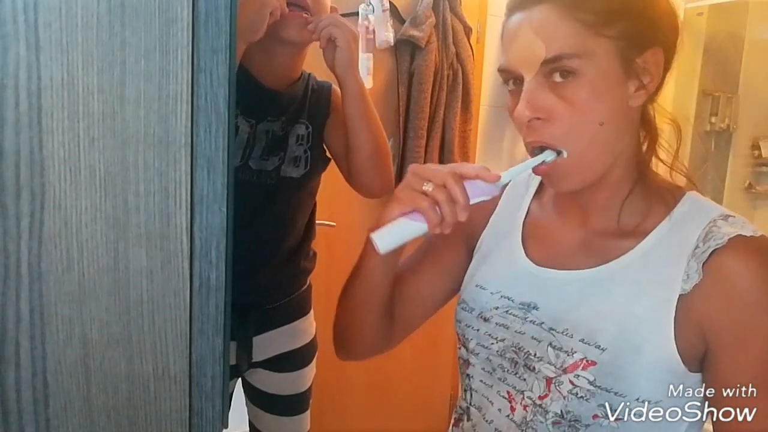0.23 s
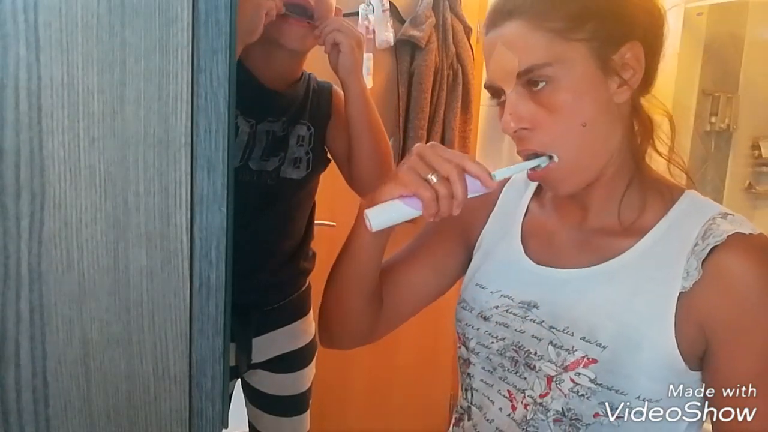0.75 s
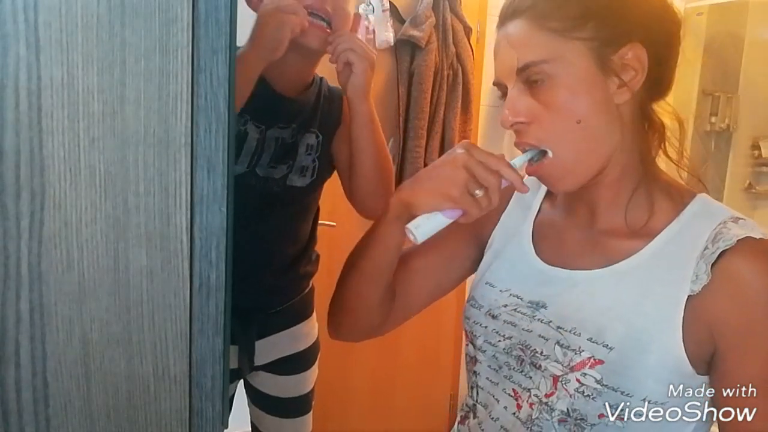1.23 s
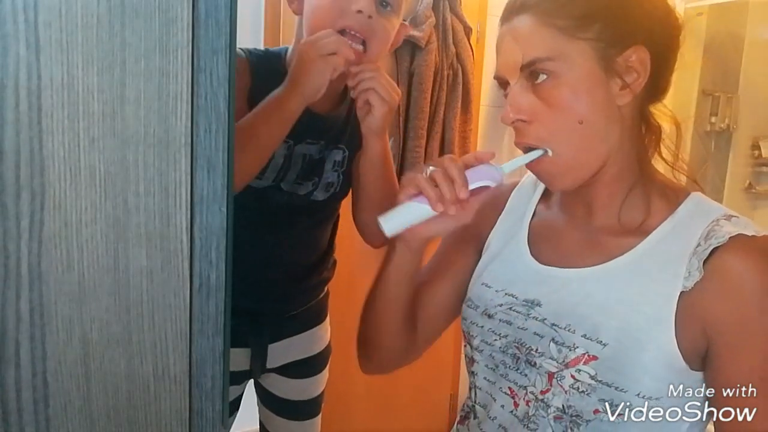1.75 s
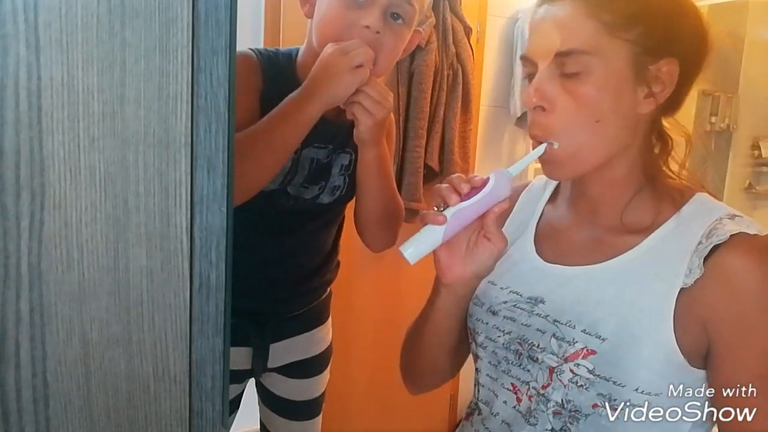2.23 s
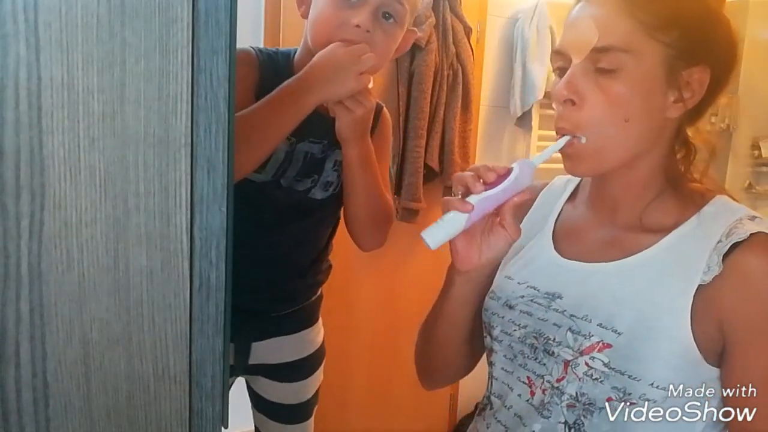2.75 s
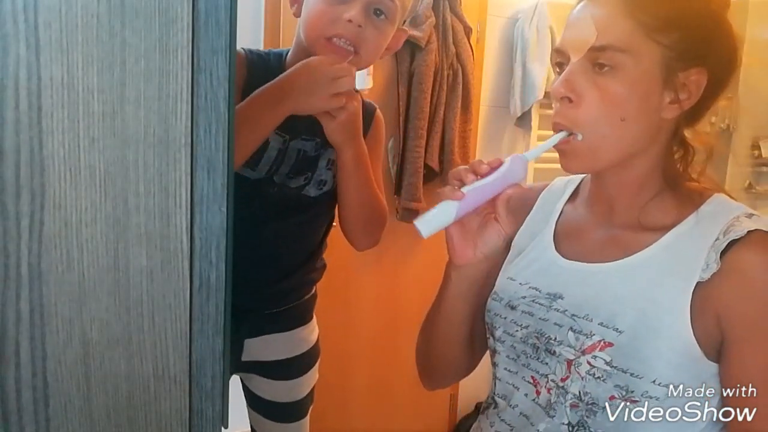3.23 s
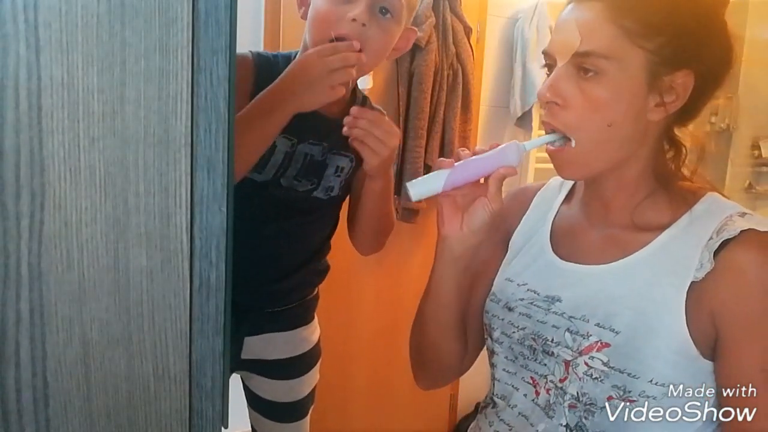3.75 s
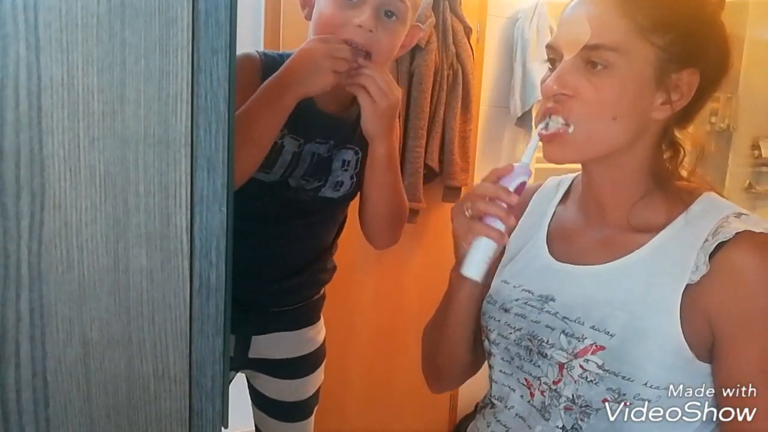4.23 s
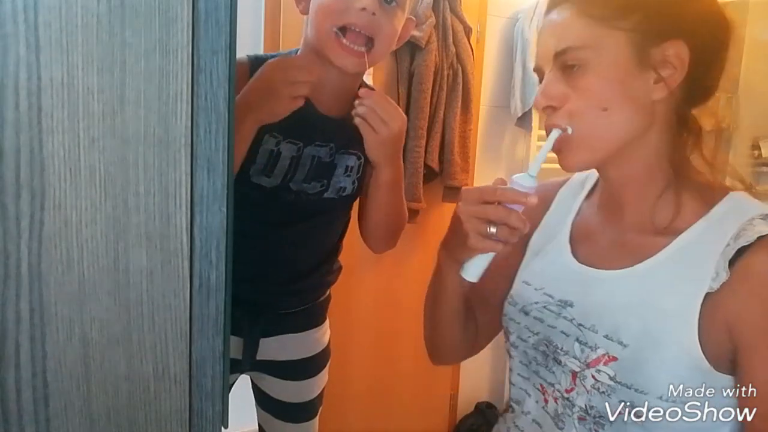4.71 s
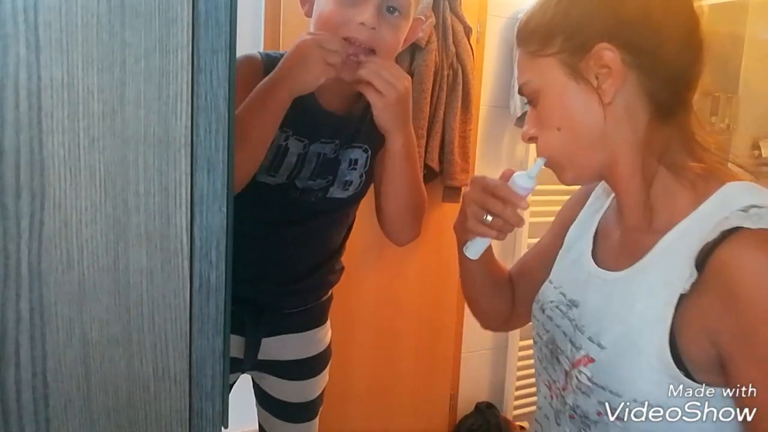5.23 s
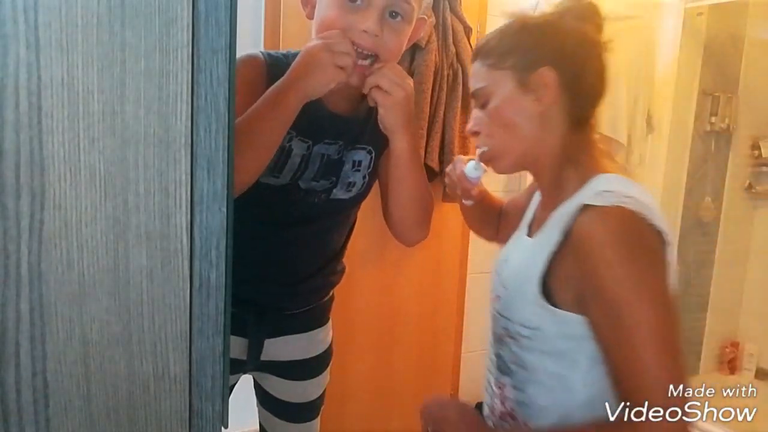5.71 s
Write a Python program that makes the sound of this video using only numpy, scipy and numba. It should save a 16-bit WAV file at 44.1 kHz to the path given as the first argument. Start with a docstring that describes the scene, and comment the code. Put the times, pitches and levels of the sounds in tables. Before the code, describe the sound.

For about six seconds an electric toothbrush buzzes continuously, already running at the start and still running at the end. It is a fast, grainy rattle, roughly sixty swings a second with a clack at each reversal, mixed with whirr, crisp bristle hiss and a weak, flickering motor hum near 480 Hz. The speed wavers a little as the brush is pressed, dipping around 1.2 s. The mouth colours it: a hollow, nasal swell around 1 to 1.4 s, others near 2.1, 3.4 and 3.8 to 4.2 s, then a thinner, drier buzz from about 4.5 s. A faint high ringing shows near 0.4 to 0.7 s, and a thin clean gear whine around 1.7 kHz from 2 to 3.3 s. Soft dull low bumps are sparse early, frequent after 3.2 s and nearly continuous from 5.3 s. Close stereo pickup, slightly uneven between sides, with short bright tiled reverberation and softened extreme treble.

```python
"""A fast, rattling buzz with a scrubbing hiss: an electric toothbrush works along the teeth in a small tiled
bathroom, close to a pair of microphone ports, over short dull patches of low noise.
The head swings to and fro about 62 times a second; noise bursts at each reversal make its clack over gear whirr.
Filters and moving resonances shape these blows into handle, bristles and mouth; two tones make the gears,
resonant noise the motor hum, delayed copies and noise tails the room, and narrow noise the dull patches."""
import sys
import numpy as np
from scipy import signal
from scipy.fft import rfft, irfft, next_fast_len
from scipy.io import wavfile
from scipy.ndimage import uniform_filter1d, map_coordinates
from numba import njit

SR = 44100
rng = np.random.default_rng(int(sys.argv[2]) if len(sys.argv) > 2 else 0)


def field_ratio(decibels):
    """Amplitude ratio for a level in dB (20 dB per decade); scalars and array-likes work."""
    return 10 ** (np.asarray(decibels, dtype=float) / 20)


def master_out(mix):
    """Clip the mix to full scale and print it as 16-bit PCM to the path in sys.argv[1]."""
    frames = np.transpose(np.atleast_2d(mix))
    ceiling = np.clip(frames, -1, 1)
    pcm = np.round(ceiling * 32767).astype(np.int16)
    wavfile.write(sys.argv[1], SR, pcm)


N = 263277


def unit(x):
    """x at rms 1."""
    return x / np.sqrt(np.mean(x ** 2) + 1e-20)


def along(points, hz):
    """Reads (frequency, value) points on a log frequency axis."""
    f, v = np.transpose(points)
    return np.interp(np.log(hz + 1), np.log(f + 1), v)


def curves(rows):
    """One value per sample for each column after the time."""
    s, *cols = np.transpose(rows)
    return [np.interp(np.arange(N) / SR, s, c) for c in cols]


def wobble(rate):
    """A smooth random curve, rate knots a second."""
    return map_coordinates(rng.standard_normal(int(N * rate / SR) + 4), [np.arange(N) * rate / SR])


def filtered(x, response):
    """x through a complex response of frequency."""
    m = next_fast_len(N + 8192)
    return irfft(rfft(x, m) * response(np.fft.rfftfreq(m, 1 / SR)), m)[..., :N]


@njit
def two_pole(x, pull, keep):
    """A resonator whose tuning changes sample by sample."""
    y = np.zeros(len(x))
    for n in range(2, len(x)):
        y[n] = x[n] - x[n - 2] + pull[n] * y[n - 1] - keep * y[n - 2]
    return y


def ring(x, hz, width_hz):
    """x through a moving resonance, at rms 1; a narrower resonance rings longer."""
    r = np.exp(-np.pi * width_hz / SR)
    return unit(two_pole(x, 2 * r * np.cos(2 * np.pi * hz / SR), r * r))


def clacks(rate, lean_db):
    """Envelope of the drive: a steady whirr with a short decaying burst at each reversal of the head."""
    clack_db, scatter_db = 12.5, 1.4  # clack over whirr, and its spread from blow to blow
    decay_s, late_s = 0.0017, .00017
    first_swing = .33  # part of a swing already done at the start
    half_swings = 2 * (first_swing + np.cumsum(rate) / SR)
    k = np.floor(half_swings).astype(int)
    luck = rng.standard_normal((k[-1] + 1, 2))
    # play in the gears delays each blow a little
    since = (half_swings - k) / (2 * rate) - late_s * np.abs(luck[k, 1])
    size = field_ratio(clack_db + scatter_db * luck[k, 0] + lean_db * (.5 - k % 2))
    return 1 + size * (since > 0) * np.exp(-np.abs(since) / decay_s)


def handle_body(drive, knock, level_db):
    """The blows shake the whole handle, whose body gives them a fixed spectrum."""
    # spectrum of the handle's body: (frequency [Hz], relative level [dB])
    body_shape = [(330, -38.5), (560, -12.5), (700, -10.5), (850, -7.5), (930, 1.5), (1100, -5.5),
                  (1550, -1.5), (1680, -2.5), (2300, -4.5), (2620, 0.5), (2800, -6), (2960, 1.5),
                  (3450, 0.5), (4200, -3), (5400, -6), (7500, -9), (12000, -27)]
    body = unit(filtered(drive(0.6) + 0.26 * knock, lambda hz: field_ratio(along(body_shape, hz))))
    return field_ratio(level_db + 3.0 + 1.6 * wobble(7.3)) * body


def handle_rings(drive, knock, rate, bare_db):
    """Two handle resonances: the low one rises with the swing rate, the high one moves with the grip."""
    # high handle ring: (time [s], level before trim [dB], pitch [Hz])
    shell_moves = [(0.0, -33, 6500), (0.01, -43.5, 6730), (0.66, -47.5, 6230), (0.78, -48.5, 6340),
                   (0.88, -56, 6550), (0.95, -42.5, 6300), (1.11, -47, 6370), (1.56, -44.5, 6700),
                   (1.93, -45.5, 6360), (2.13, -53.5, 6940), (2.31, -43, 6770), (2.96, -54, 6830),
                   (3.19, -44, 6850), (3.52, -47, 6970), (3.69, -49, 6250), (3.91, -45, 6070),
                   (4.11, -48, 6760), (4.42, -41.5, 6240), (4.51, -50.5, 6320), (5.12, -46, 6930),
                   (5.17, -45.5, 6400), (5.97, -55.5, 6580)]
    shell_db, shell_hz = curves(shell_moves)
    grip_db = 1.2  # shifting fingers damp each ring unevenly
    whine_hz = 4950 + 14 * (rate - 62)  # 14 Hz up per extra swing a second
    whine = ring(drive(1.0) + 0.27 * knock, whine_hz, 350)
    whine = field_ratio(bare_db - 4.5 + grip_db * wobble(10)) * whine
    shell = ring(drive(1.87) + knock, shell_hz, 940)
    shell = field_ratio(shell_db - 2 + grip_db * wobble(7.1)) * shell
    return whine + shell


def bristles(drive):
    """Scrub on the teeth is treble noise: one fizz from the brush and a spray separate at each port."""
    # bristles on the teeth: (time [s], level before trims [dB])
    scrub_moves = [(0.0, -43.5), (0.03, -49.5), (0.08, -49.5), (0.66, -52), (0.8, -50), (0.86, -51.5),
                   (1.96, -53), (2.01, -51), (2.04, -48.5), (2.28, -53), (3.62, -51), (3.82, -53.5),
                   (3.99, -50), (4.12, -52.5), (4.16, -50), (4.65, -52), (4.89, -47.5), (4.92, -53.5),
                   (5.02, -52.5), (5.92, -52.5), (5.95, -69), (5.97, -54)]
    # spectrum of the bristles: (frequency [Hz], relative level [dB])
    fizz_shape = [(3000, -29), (5500, 0), (7200, -5), (7700, -4.5), (8300, 1), (10000, -1.5), (12000, -3.5),
                  (13700, -12), (14400, -10.5), (15500, -31)]
    scrub_db, = curves(scrub_moves)
    response = lambda hz: field_ratio(along(fizz_shape, hz))
    fizz = field_ratio(scrub_db + 4 + 0.69 * wobble(13)) * unit(filtered(drive(1.13), response))
    both_ports = np.array([drive(0.8), drive(0.88)])
    spray = field_ratio(scrub_db - 1.5) * unit(filtered(both_ports, response))
    return fizz, spray


def mouth(drive, knock):
    """The blows excite two moving resonances of the mouth, and the lips flutter round the brush."""
    # shape of the mouth: (time [s], low resonance [Hz], level before trim [dB], high resonance over low [dB])
    mouth_shape = [(0, 1380, -48, 12), (.2, 1300, -53, 3), (.45, 1370, -52, 9), (.65, 1380, -51, 4),
                   (.85, 1470, -51, 3.5), (.98, 1410, -44.5, 0), (1.08, 1280, -40.5, 3),
                   (1.22, 1250, -43.5, 0), (1.38, 1230, -43, -3), (1.6, 1310, -50.5, 2),
                   (1.9, 1304, -54, 9), (2.1, 1530, -46, -9), (2.5, 1430, -55, 1), (2.95, 1480, -59, 6.5),
                   (3.35, 1370, -45, -3), (3.5, 1350, -48, -3), (3.66, 1390, -50, -10),
                   (3.76, 1390, -44, -12), (3.9, 1540, -49, -29), (4.17, 1410, -44, 1),
                   (4.34, 945, -51.5, -22), (4.55, 1530, -70, 1), (4.78, 1460, -63, 20),
                   (4.9, 1300, -75, 16), (5.05, 1480, -76, -13), (5.3, 1440, -55, 13),
                   (5.5, 1480, -57, -21), (5.97, 1380, -90, -14)]
    # high resonance of the mouth: (time [s], pitch [Hz])
    upper_pitch = [(0.0, 1820), (0.83, 1830), (1.01, 2000), (2.11, 1800), (2.24, 1880), (2.56, 1720),
                   (2.71, 1980), (3.04, 1900), (3.08, 2080), (3.81, 1900), (3.91, 1820), (4.17, 1820),
                   (4.21, 1950), (4.7, 1730), (4.82, 2020), (5.4, 1870), (5.75, 1900), (5.97, 1840)]
    low_hz, low_db, tilt_db = curves(mouth_shape)
    high_hz, = curves(upper_pitch)
    lips_db, lips_hz = 1.4, 35  # scale of the flutter in level and pitch
    low = ring(drive(1.44) + knock, low_hz + lips_hz * wobble(12), 220)
    low = field_ratio(lips_db * wobble(10)) * low
    high = ring(drive(1.1) + knock, high_hz, 380)
    high = field_ratio(tilt_db + lips_db * wobble(10)) * high
    return field_ratio(low_db - 5.5) * (low + high)


def hollow(drive, knock):
    """A small hollow between lips and brush rings out briefly, driven by the same blows and swaying in pitch;
    the rows above 6 kHz are brief swells of the handle's high ring, played the same way."""
    # rings of the hollow, and brief swells of the high handle ring above 6 kHz: (start [s], length [s], pitch
    # [Hz], width [Hz], relative level [dB])
    hollow_rings = [(-.06, .24, 1215, 45, -44), (.34, .375, 5030, 130, -45), (.72, .06, 4980, 150, -49),
                    (1.3, .12, 1400, 120, -47), (1.52, .14, 1360, 110, -48), (1.52, .05, 3450, 90, -45),
                    (1.61, .06, 3470, 110, -46), (1.665, .025, 3600, 120, -47),
                    (1.893, .035, 1000, 140, -43), (3.47, .03, 1400, 200, -48), (3.53, .06, 1280, 160, -46),
                    (3.65, .05, 1400, 350, -46.5), (3.79, .09, 1380, 300, -45), (3.86, .15, 1520, 220, -46),
                    (4.06, .09, 1520, 200, -46), (4.165, .07, 1450, 180, -44.5),
                    (4.08, .06, 1800, 200, -47), (4.29, .04, 1050, 150, -50), (4.76, .025, 1980, 150, -48),
                    (4.77, .035, 3300, 600, -43), (4.76, .07, 2700, 200, -48), (4.83, .035, 3150, 500, -46),
                    (4.82, .085, 2020, 180, -47), (4.905, .07, 1870, 200, -47), (.43, .11, 6550, 400, -47),
                    (.69, .12, 6450, 450, -48), (4.97, .16, 7600, 700, -48), (5.25, .17, 4950, 150, -50),
                    (4.875, .03, 2500, 500, -46), (4.95, .12, 2600, 150, -49)]
    t, out = np.arange(N) / SR, np.zeros(N)
    for s, length, hz, width, db in hollow_rings:
        sway_hz = hz + .15 * width * wobble(15)
        tone = ring(drive + width / 1000 * knock, sway_hz, 1.4 * width)  # wider rings take more of the blow
        tone = ring(tone, sway_hz, 1.4 * width)  # twice, for steep skirts
        strength = uniform_filter1d(tone ** 2, size=round(.02 * SR))
        even = np.sqrt(np.abs(strength) + .1)  # the ring holds its strength over 20 ms
        opening = np.sin(np.pi * np.clip((t - s) / length, 0, 1)) ** .35  # opens and shuts quickly
        out += field_ratio(db) * opening * tone / even
    return out


def gears(rate):
    """Held steady, the gears sing: two clean tones, the 26th and 28th multiples of the swing, wavering."""
    # song of the gears: (start [s], end [s], relative level [dB])
    gear_song = (1.95, 3.3, -55.5)
    start, end, db = gear_song
    t = np.arange(N) / SR
    held = np.clip(np.minimum(t - start, end - t) / 0.053, 0, 1)
    turn = 2 * np.pi * np.cumsum(rate) / SR
    return held * field_ratio(db + 1.5 * wobble(5)) * (np.sin(28 * turn) + np.sin(26 * turn))


def brush():
    """The same blows drive the body, the bristles, the handle rings and the mouth; mouth and gears come apart."""
    # head of the brush, slowing when pressed on the teeth: (time [s], swing rate [swings/s])
    swing_rate = [(0, 59.9), (.2, 60.6), (.45, 64.7), (.66, 63.9), (.76, 61.4), (1, 61.2), (1.17, 56.5),
                  (1.42, 60), (1.9, 63.2), (2.07, 63.9), (2.3, 62), (2.62, 62.9), (2.9, 62.6), (3.14, 63.7),
                  (3.45, 62.6), (3.59, 59.6), (3.7, 61.5), (3.92, 60.1), (4.14, 63.9), (4.45, 60.4),
                  (4.6, 63.5), (4.78, 59.2), (5.13, 58), (5.3, 61.5), (5.5, 62), (5.8, 60.3), (5.97, 62.5)]
    # how the brush is held: (time [s], level before trims [dB], bare handle over it before trim [dB],
    # forward reversal over backward one [dB])
    brush_hold = [(0, -43.5, -1.5, 8.5), (.35, -46.5, 2, 8), (.62, -51, 5.5, 13), (.8, -48.5, -4, 17),
                  (.9, -45.5, 1, 5.5), (1.15, -47, 4, 9), (1.5, -47.5, 3.5, 9), (1.8, -45, 4, 7.5),
                  (2.15, -46, 1.5, 3), (2.4, -44.5, -6, 5.5), (2.8, -46, -2, 7), (3.12, -47, -2, 7.5),
                  (3.3, -44.5, 0, 5), (3.75, -46, -1, -5), (4.1, -47, 2.5, -3), (4.35, -47.5, 6.5, 5.5),
                  (4.55, -46.5, -3, 10), (4.84, -47.5, 2.5, 14), (5.05, -47, -1, 10), (5.33, -48.5, 5, 4),
                  (5.55, -47, -2, -3.5), (5.97, -48.5, -3, 5)]
    rate, = curves(swing_rate)
    level_db, bare_db, lean_db = curves(brush_hold)
    beat = clacks(rate, lean_db)
    flutter = field_ratio(0.13 * wobble(30))  # the bristles catch unevenly
    knock = 24 * np.maximum(np.diff(beat, prepend=1), 0)  # onset of each blow, a click without noise

    def drive(power):
        """Fresh noise under the beat; a higher power makes the clacks stand out more."""
        return beat ** power * flutter * rng.standard_normal(N)

    fizz, spray = bristles(drive)
    spread = handle_body(drive, knock, level_db) + fizz
    spread = spread + handle_rings(drive, knock, rate, level_db + bare_db)
    rings = hollow(drive(0.71), knock)
    no_bass = lambda hz: 1 / (1 + (850 / (hz + 1)) ** 8)  # closed lips and cheeks pass no bass
    voiced = filtered(mouth(drive, knock) + field_ratio(-9) * rings, no_bass)  # this share of the hollow meets the walls
    straight = spray + field_ratio(-5) * rings  # this share is heard straight at both ports
    return spread, voiced + gears(rate), straight


def paths(x, rows):
    """Direct sound and near walls: a few delayed copies, scaled so their squared gains add to 1."""
    total = np.sqrt(sum(g * g for _, g in rows))
    return filtered(x, lambda hz: sum(g * np.exp(-2j * np.pi * hz * ms / 1000) for ms, g in rows)) / total


def tiles(x, count):
    """The bathroom's tail, each frequency dying at its own speed; the brush moves, so the tail keeps changing."""
    # decay of the tiled room: (frequency [Hz], time to fall 60 dB [s])
    tile_decay = [(300, 0.81), (2000, 1), (10000, 0.5)]
    hop = N // count + 1
    hz, t, z = signal.stft(rng.standard_normal((count + 1, 2, SR // 2)), SR, nperseg=256)
    decay = field_ratio(-60 * t / along(tile_decay, hz)[:, None])
    tails = signal.istft(z * decay, SR, nperseg=256)[1]
    tails /= np.linalg.norm(tails, axis=2, keepdims=True)
    x, fade = np.pad(x, (hop + 130, 3 * hop)), np.sqrt(np.hanning(2 * hop))
    out = np.zeros((2, len(x) + SR))
    for k, tail in enumerate(tails):
        faded = fade * x[k * hop:][:2 * hop]  # overlapping stretches, a new tail for each
        part = signal.fftconvolve(faded[None], tail, axes=1)
        out[:, k * hop:][:, :part.shape[1]] += part
    return out[:, hop:hop + N]


def patchy(x):
    """Random patches of gain, some hundred Hz by 40 ms, deepest in the treble and alike at both ports."""
    # depth of the patches: (frequency [Hz], rms depth [dB])
    patch_depth = [(600, .6), (1500, .8), (5000, .9), (9000, 1), (13000, 2.5)]
    hz, t, z = signal.stft(x, SR, nperseg=512)
    field = uniform_filter1d(rng.standard_normal(z.shape[1:]), size=6, axis=0)
    field = uniform_filter1d(field, size=7, axis=1)
    gain = field_ratio(along(patch_depth, hz)[:, None] * unit(field))
    return signal.istft(z * gain, SR, nperseg=512)[1][:, :N]


def hum():
    """The motor's hum, straight from the handle: noise through two equal resonances; its level dips briefly."""
    # motor hum: (pitch [Hz], width of each resonance [Hz], relative level [dB])
    hum_tone = (480, 49, -66)
    # stretches where the hum is heard fainter: (start [s], length [s])
    hum_dips = [(0.449, 0.063), (0.624, 0.054), (0.748, 0.069), (.865, 0.028), (1.144, 0.11), (1.495, 0.17),
                (1.698, 0.027), (1.77, .025), (1.865, 0.053), (2.274, .025), (2.424, 0.047), (2.51, .03),
                (2.647, 0.041), (2.866, 0.058), (3.406, 0.098), (4.027, 0.033), (4.292, 0.082),
                (4.387, 0.14), (4.9, .03), (5.1, 0.017), (5.247, 0.015), (5.309, .02)]
    hz, width, db = hum_tone
    t, pitch = np.arange(N) / SR, np.full(N, hz * 1.)
    dips = uniform_filter1d(sum(1. * (t > s) * (t < s + length) for s, length in hum_dips), size=400)
    tone = lambda: ring(ring(rng.standard_normal(N), pitch, width), pitch, width)
    shared = tone()
    lag_ms = 0.71  # the right port hears the shared hum later and fainter
    late = filtered(shared, lambda f: np.exp(-2j * np.pi * f * lag_ms / 1000))
    pair = np.array([field_ratio(3.5) * shared, late]) + 0.33 * np.array([tone(), tone()])
    return field_ratio(db + 3.5 * wobble(18) - 19 * dips) * pair  # a full dip thins the hum by 19 dB


def low_patches():
    """Short dull patches of low noise: a narrow band round each pitch under a rounded envelope."""
    # patches of low noise: (start [s], level before trim [dB], pitch [Hz], length [s])
    dull_patches = [(0.889, -65, 124, 0.064), (1.242, -65.5, 59.2, 0.062), (1.336, -49, 79.6, 0.048),
                    (1.427, -59.5, 317, 0.03), (2.047, -68, 60, 0.065), (2.456, -63.5, 319, 0.073),
                    (2.651, -68, 151, 0.052), (2.848, -59, 113, 0.085), (2.934, -62, 107, 0.037),
                    (3.199, -61, 109.4, 0.11), (3.316, -59.5, 157, 0.098), (3.537, -56, 129, 0.051),
                    (3.611, -55, 168, 0.1), (3.709, -57, 161, 0.079), (3.79, -61, 168, 0.074),
                    (3.875, -67, 187, 0.047), (4.073, -67.5, 157, 0.057), (4.15, -64.5, 200, 0.083),
                    (4.238, -55.5, 169, 0.047), (4.278, -52, 83.4, 0.11), (4.562, -52.5, 266, 0.056),
                    (4.682, -53, 191, 0.091), (4.832, -47.5, 82, 0.045), (4.888, -77, 40.6, 0.089),
                    (5.057, -57.5, 194, 0.026), (5.276, -59.5, 326, 0.052), (5.4, -55, 288, 0.11),
                    (5.466, -52, 271, 0.1), (5.538, -50, 236, 0.1), (5.546, -47.5, 74, 0.051),
                    (5.644, -58, 288, 0.094), (5.736, -57.5, 290, 0.09), (5.829, -57.5, 318, 0.1),
                    (5.912, -71, 200, 0.11)]
    out, t = np.zeros((2, N + SR)), np.arange(SR // 2) / SR
    for s, db, hz, length in dull_patches:
        noise = rng.standard_normal((3, len(t)))
        band = signal.butter(2, [0.77 * hz, 1.29 * hz], "band", fs=SR, output="sos")
        dull = unit(signal.sosfilt(band, noise[0] + 0.58 * noise[1:]))  # part shared, part each port's own
        envelope = np.sin(np.pi * np.clip(t / length, 0, 1)) ** .7
        out[:, round(s * SR):][:, :len(t)] += field_ratio(db - 4.0) * dull * envelope
    return out[:, :N]


def scene():
    """Brush direct and through the room, hum and low patches; mouth and gears face the ports, not the walls."""
    # direct sound and near walls at each port, the left hearing the direct sound a little later:
    # (delay [ms], relative gain)
    left_paths = [(0.135, 0.022), (1.303, -0.02), (2.904, 0.014)]
    right_paths = [(0, 0.88), (0.481, -0.14), (0.729, 0.69), (1.572, -0.27), (2.297, 0.13)]
    # how each port hears the brush: (frequency [Hz], left over right [dB])
    port_balance = [(200, -2), (480, 1.5), (950, 3), (1200, 11), (1380, 1), (2000, 14.5), (2350, -8),
                    (2660, 12.5), (3000, 4.5), (4400, 8.5), (5000, 6), (6570, 7.5), (8100, 6.5),
                    (11000, 4.5), (12400, -1), (15000, 1)]
    # the head turns; only departures from the mean count: (time [s], left over right [dB])
    head_turn = [(0.0, 7.5), (0.2, 4), (0.43, 4.5), (1.89, 3.5), (2.06, 4), (2.34, 3.5), (2.81, 2.5),
                 (3.69, 4.5), (3.91, 5), (4.49, 3), (5.1, 4.5), (5.97, 2.5)]
    spread, aimed, straight = brush()
    turn_db, = curves(head_turn)
    aimed_db = 3.5  # gain towards the ports, loss towards the walls
    x = spread + field_ratio(aimed_db) * aimed
    near = np.array([field_ratio(-9.0) * paths(x, left_paths), field_ratio(-5.0) * paths(x, right_paths)])
    room = field_ratio(-3.5) * tiles(spread + field_ratio(-aimed_db) * aimed, count=24)
    sides = np.array([[.5], [-.5]])  # half of each difference goes to either port
    heard = filtered(near + straight + room, lambda hz: field_ratio(along(port_balance, hz) * sides))
    turned = field_ratio(1.67 + (turn_db - turn_db.mean()) * sides) * patchy(heard)
    return turned + hum() + low_patches()


def faint_bands_emptied(x, ease_db, wander_db):
    """Faint bands fall silent frame by frame, fewer of them when there is bass."""
    # level under which a band empties, before easing and wander: (frequency [Hz], level [dB])
    empty_level = [(100, -86.5), (390, -81), (480, -77.5), (600, -73), (730, -72.5), (820, -73.5),
                   (900, -85.5), (11000, -100), (12000, -88), (13000, -82.5), (13800, -83.5), (14500, -82),
                   (15500, -77)]
    window = np.sqrt(np.hanning(2049)[1:])
    lead = 221  # samples of silence ahead, setting where the frames start
    hz, t, z = signal.stft(np.pad(x, ((0, 0), (lead, 0))), SR, window, nperseg=2048)
    edges = np.r_[0:48:4, 48:512:16, 512:len(hz):32]  # bands widen with pitch
    width = np.diff(edges, append=len(hz))
    power = np.add.reduceat(np.abs(z) ** 2, edges, axis=1) / width[:, None]
    level_db = along(empty_level, hz[edges] + hz[width // 2])[:, None]
    heard = (power[:, :3] > field_ratio(2 * level_db[:3])).any(axis=0)  # the three deepest bands, at either port
    # above the hum only the deepest bass counts
    bass = np.where(hz[edges, None] < 500, heard.any(axis=0), heard[0])
    wander = wander_db * uniform_filter1d(rng.standard_normal(len(t)), size=3)
    keep = power > field_ratio(2 * (level_db - ease_db * bass + wander))
    z = z * np.repeat(keep, width, axis=1)
    return signal.istft(z, SR, window, nperseg=2048)[1][:, lead:lead + N]


def top_cut(x):
    """Nothing passes above the cut-off."""
    return signal.sosfilt(signal.butter(12, 15710, fs=SR, output="sos"), x)


def record(dry):
    """Empties the faint bands and returns the finished mix."""
    mix = faint_bands_emptied(dry, ease_db=8.5, wander_db=1.5)
    return top_cut(mix)


dry = scene()
out = record(dry)
master_out(out)
```